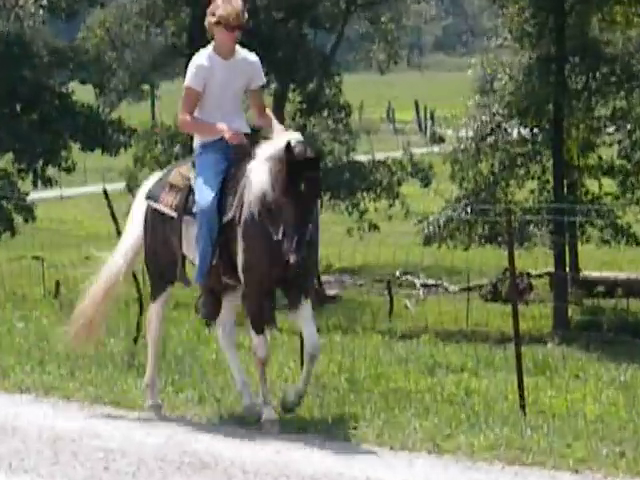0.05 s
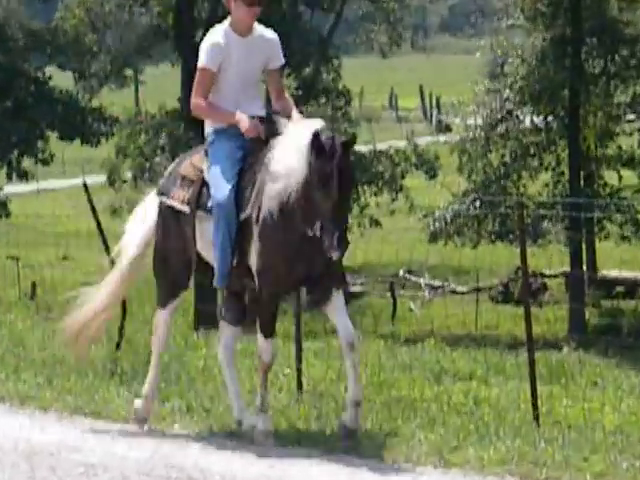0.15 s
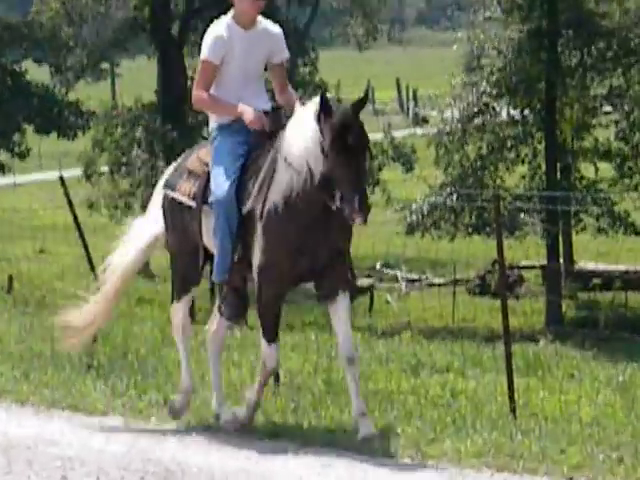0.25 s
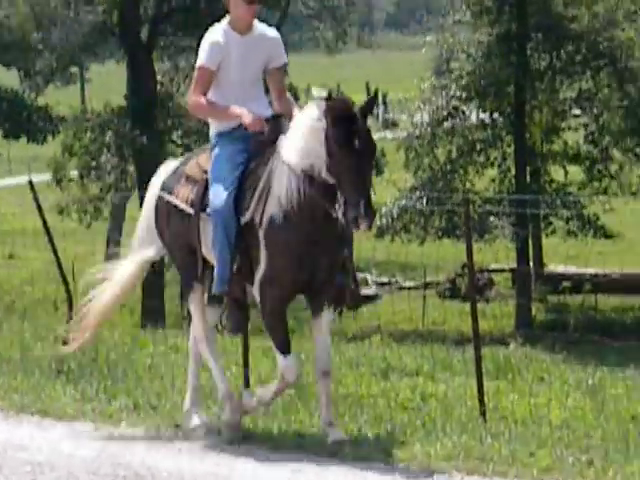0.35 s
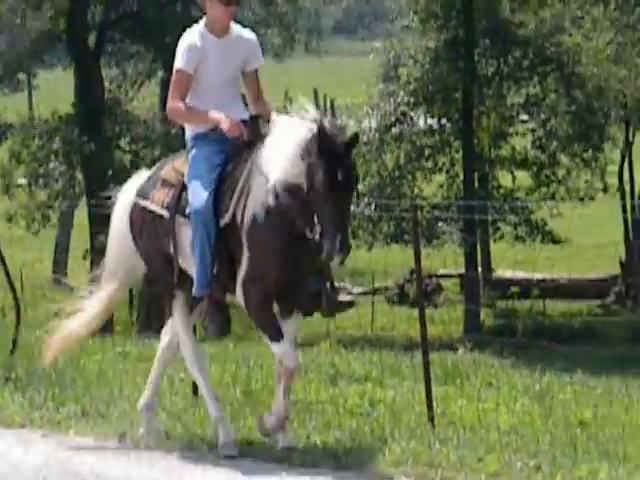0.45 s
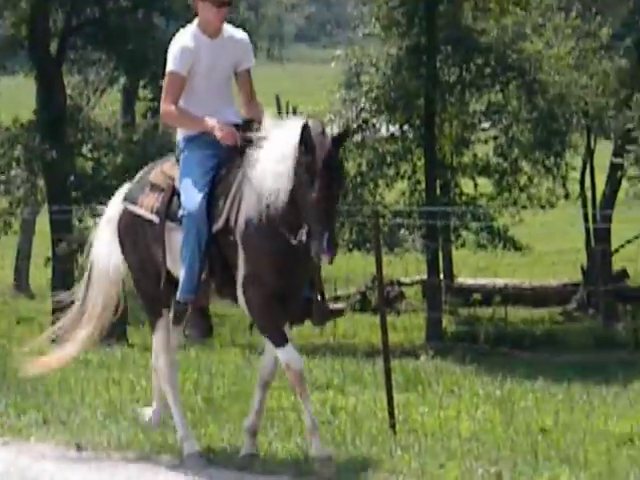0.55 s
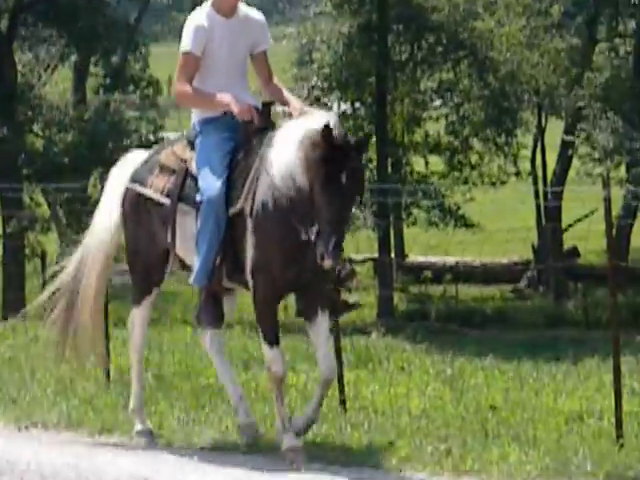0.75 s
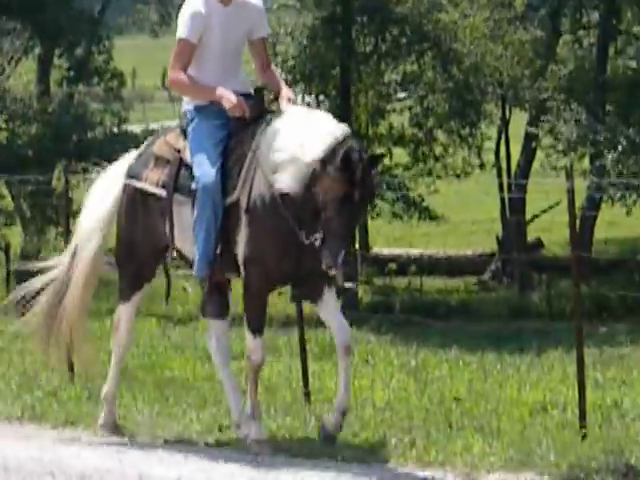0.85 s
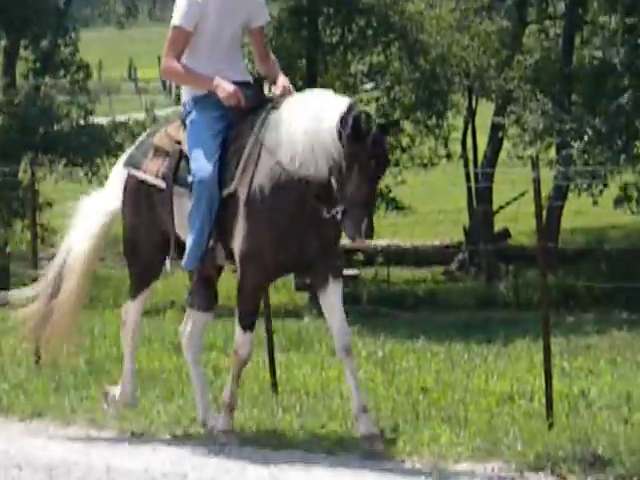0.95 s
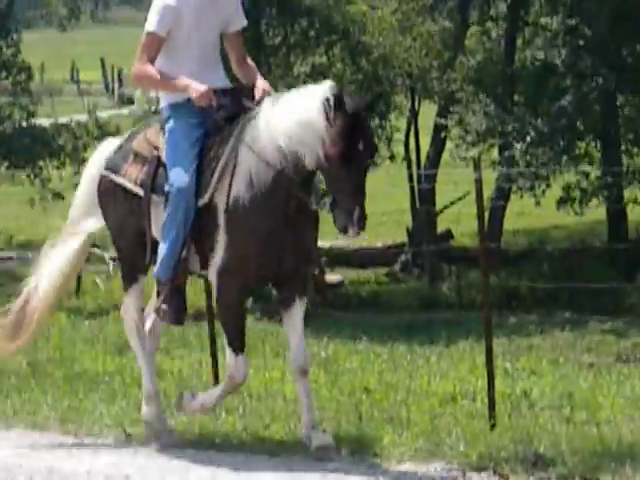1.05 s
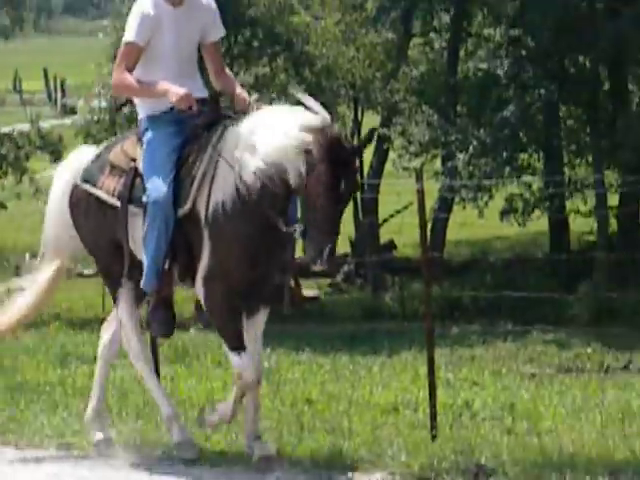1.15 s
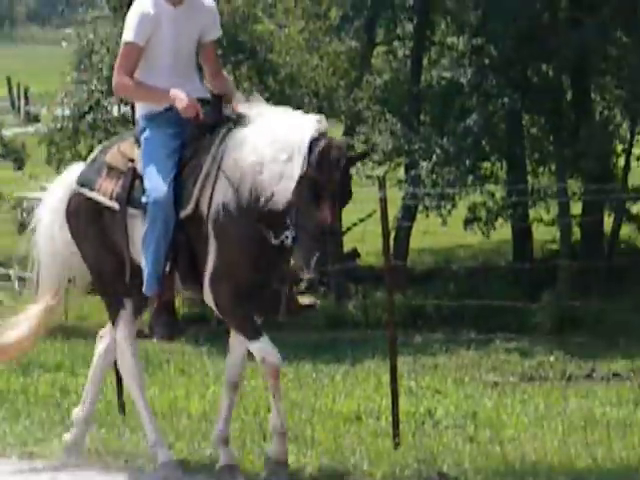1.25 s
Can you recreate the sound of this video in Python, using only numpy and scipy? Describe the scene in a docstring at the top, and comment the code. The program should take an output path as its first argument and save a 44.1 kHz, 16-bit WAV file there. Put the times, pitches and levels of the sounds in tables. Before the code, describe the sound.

Soft hoof thuds and scuffs come from a horse walking on turf in the open air. One loud, close knock and a few light clacks stand out near the start, over steady hiss and low hum on a small microphone.

```python
"""A horse walks over grass beside a gravel road, its hooves scuffing and bumping softly on the turf.
Behind it lie an airy outdoor hiss and a wavering low hum. A few light clacks sound among the steps,
and early on comes one sharp, hard knock close by. The small, narrow-band camera microphone stands
in the open air, with no echo. The knock is loud enough to clip briefly, and the level dips after it."""
import sys
import numpy as np
from scipy import signal
from scipy.fft import rfft, irfft, next_fast_len
from scipy.io import wavfile
from scipy.ndimage import map_coordinates

SR = 44100
rng = np.random.default_rng(int(sys.argv[2]) if len(sys.argv) > 2 else 0)


def file_out(sig):
    """Save sig as 16-bit WAV at sys.argv[1]."""
    # one column per channel
    cols = np.atleast_2d(sig).T
    # limit, then scale
    lim = np.clip(cols, -1, 1)
    pcm = np.round(lim * 32767).astype(np.int16)
    wavfile.write(sys.argv[1], SR, pcm)


N = 57330
TOP_HZ = 4743  # upper edge of the microphone's band


def amp(db):
    """Decibels to gain."""
    return 10 ** (np.asarray(db) / 20)


def unit(x):
    """Scale to rms 1."""
    return x / np.sqrt(np.mean(x ** 2) + 1e-20)


def curve(rows):
    """One value per sample from rows of t/s, value."""
    return np.interp(np.arange(N) / SR, *np.transpose(rows))


def since(start):
    """Seconds since start at every sample, zero before it."""
    return np.maximum(np.arange(N) / SR - start, 0)


def wobble(rate):
    """A smooth random curve with rate knots a second."""
    return map_coordinates(rng.standard_normal(4096), [np.arange(N) * rate / SR], mode="wrap")


def filtered(x, response):
    """Shape x by a gain that is a function of frequency."""
    size = next_fast_len(N + SR // 2)
    return irfft(rfft(x, size) * response(np.fft.rfftfreq(size, 1 / SR)), size)[:N]


def high_pass(x, hz, order):
    """Take out the bass below hz."""
    return signal.sosfilt(signal.butter(order, hz, "high", fs=SR, output="sos"), x)


def low_pass(x, hz, order):
    """Take out the treble above hz, with no phase shift."""
    return filtered(x, lambda f: 1 / np.sqrt(1 + (f / hz) ** (2 * order)))


def noise(colour_db):
    """Noise of rms 1 up to TOP_HZ, coloured by a function from Hz to dB."""
    white = rng.standard_normal(N)
    return unit(filtered(white, lambda f: amp(colour_db(f + 1) - 120 * (f + 1 > TOP_HZ))))


def band_noise(centre_hz, width_oct):
    """Noise in a bell-shaped band, 3 dB down at width_oct from its centre."""
    return noise(lambda f: -3 * (np.log2(f / centre_hz) / width_oct) ** 2)


def struck(t, attack_s, t60):
    """A quick rise, then a decay of 60 dB in t60 seconds."""
    return (1 - np.exp(-t / attack_s)) * np.exp(-np.log(1000) * t / t60)


def ring(t, hz, attack_s, t60):
    """One damped mode."""
    return np.sin(2 * np.pi * hz * t) * struck(t, attack_s, t60)


def air():
    """The roadside's even, airy hiss, swelling slightly."""
    # spectrum of the hiss: f/Hz, relative level/dB
    spectrum = [(25, 3.5), (60, -10.5), (120, 0.5), (200, 7), (290, 3), (390, 4.5), (560, -2.5),
                (1200, -.5), (2100, -1.5), (3000, 0), (3700, -3.5), (4400, -6.5)]
    level_db, swell_db = -42, 1.5
    hz, db = np.transpose(spectrum)
    hiss = noise(lambda f: np.interp(np.log(f), np.log(hz), db))
    return hiss * amp(level_db + swell_db * wobble(rate=12))


def hum():
    """A low background tone with a faint octave, wavering in level and phase."""
    # pitch of the hum: t/s, f/Hz
    pitch = [(0, 193.5), (.28, 188.3), (.37, 193.6), (1.23, 193.2), (1.3, 183.3)]
    # loudness of the hum: t/s, level/dB
    level = [(0, -38.5), (.04, -39.5), (.085, -45), (.13, -39.5), (.2, -43.5), (.35, -43), (.48, -39.5),
             (.62, -40.5), (.83, -38), (.98, -40), (1.05, -39.5), (1.3, -39.5)]
    waver_rad, waver_db, octave_db = 0.086, 1.5, -25
    phase = 2 * np.pi * np.cumsum(curve(pitch)) / SR + waver_rad * wobble(rate=38)
    tone = unit(np.sin(phase) + amp(octave_db) * np.sin(2 * phase))
    return tone * amp(curve(level) + waver_db * wobble(rate=38))


def clacks():
    """Small hard contacts, each with two brief modes and some bright grit, but no bass."""
    # light, dry contacts: t/s, level/dB, low mode f/Hz, high mode f/Hz,
    # relative high mode level/dB, relative grit level/dB
    contacts = [(0.1091, -12.5, 1110, 1990, -10.5, -7), (0.1459, -8.5, 774, 3350, -8, -14),
                (0.5352, -17, 2094, 2880, -5.5, -8), (0.5394, -25.5, 2130, 3100, -11, 4.5),
                (1.2848, -22, 1950, 2990, -1, 9)]
    attack_s = 0.00032
    out = np.zeros(N)
    for start, db, low_hz, high_hz, high_db, grit_db in contacts:
        t = since(start)
        low = ring(t, low_hz, attack_s, t60=0.0059)
        high = amp(high_db) * ring(t, high_hz, attack_s, t60=0.012)
        grit = high_pass(rng.standard_normal(N), hz=1200, order=2) * struck(t, attack_s, t60=0.012)
        out += amp(db) * (low + high + amp(grit_db) * grit)
    return high_pass(out, hz=290, order=2)


def knock():
    """Close by, a light touch, then a hard blow: a crack and bright modes over a faint low body."""
    # the touch and the blow: t/s, relative level/dB
    contacts = [(0.2132, -23), (0.2342, 2)]
    # resonances of the struck object: f/Hz, relative level/dB, t60/s
    modes = [(1163, -12, 0.025), (1302, 0, 0.011), (1481, -3, 0.0091), (1660, -19, 0.027),
             (2083, -8, 0.024), (2646, 0, 0.024), (2910, -7.5, 0.021), (3205, -7, 0.025),
             (3482, -5.5, .016), (3860, -18.5, 0.018)]
    level_db, crack_db, body_db, attack_s = 1.5, -4.5, -16.5, 0.0012
    bright, body = np.zeros(N), np.zeros(N)
    for start, db in contacts:
        t = since(start)
        ringing = sum(amp(mode_db) * ring(t, hz, attack_s, t60) for hz, mode_db, t60 in modes)
        crack = amp(crack_db) * rng.standard_normal(N) * struck(t, attack_s, t60=0.014)
        bright += amp(db) * (ringing + crack)
        body += amp(db + body_db) * ring(t, hz=430, attack_s=attack_s, t60=0.01197)
    return amp(level_db) * (high_pass(bright, hz=950, order=6) + body)


def hoof_scuffs():
    """Each hoof drags through grass and grit in a short, grainy rustle."""
    # hoof drags: t/s, level/dB, length/s, centre f/Hz
    drags = [(0.099, -41, 0.075, 1500), (0.203, -32, .03, 1575), (0.217, -31.5, 0.014, 1820),
             (0.309, -44, 0.036, 1470), (.675, -30.5, 0.013, 1900), (0.823, -29.5, 0.012, 2200),
             (0.849, -32, 0.028, 1850), (1.184, -31.5, 0.024, 1460), (1.206, -29.5, 0.014, 1300)]
    rise_s, grain_depth = 0.006, 0.38
    out = np.zeros(N)
    for start, db, length_s, centre_hz in drags:
        t = since(start)
        rustle = band_noise(centre_hz, width_oct=1.02)
        grains = unit(rustle * np.exp(grain_depth * wobble(rate=700)))
        envelope = (1 - np.exp(-t / rise_s)) * np.exp(-(t / length_s) ** 2)
        out += amp(db) * grains * envelope
    return out


def hoof_bumps():
    """The weight of a hoof lands on turf: a brief hollow note inside a dull thud."""
    # soft footfalls: t/s, level/dB, f/Hz
    footfalls = [(.319, -30.5, 810), (.452, -37.5, 650), (.683, -28.5, 328), (.992, -34, 570),
                 (1.063, -27.5, 389), (1.189, -29, 852), (1.208, -25.5, 1090)]
    attack_s, thud_db = 0.00041, -6.5
    out = np.zeros(N)
    for start, db, hz in footfalls:
        t = since(start)
        note = ring(t, hz, attack_s, t60=0.02)
        thud = amp(thud_db) * band_noise(hz, width_oct=0.8) * struck(t, attack_s, t60=0.064)
        out += amp(db) * (note + thud)
    return out


def scene():
    """What reaches the microphone beside the road: one channel, open air, no echo."""
    return (air() + hum() + knock() + clacks() + hoof_scuffs() + hoof_bumps())[None]


def gain_control(x):
    """The gain drops after a loud peak, holds and then recovers."""
    threshold_db, duck_per_db = -13, 0.3
    attack_s, hold_until_s, release_s = 0.01, 0.036, 0.035
    over_db = np.maximum(20 * np.log10(np.abs(x) + 1e-9) - threshold_db, 0)
    t = since(0)
    dip = np.clip(t / attack_s, 0, 1) * np.clip(1 - (t - hold_until_s) / release_s, 0, 1)
    duck_db = np.zeros(N)
    for peak in signal.find_peaks(over_db)[0]:
        duck_db[peak:] = np.maximum(duck_db[peak:], duck_per_db * over_db[peak] * dip[:N - peak])
    return x * amp(-duck_db)


def record(dry):
    """The camera microphone hears a narrow band; the knock clips briefly and the level dips after it."""
    clip_level = 1.005
    ducked = gain_control(dry[0])
    narrow = low_pass(ducked, hz=3982, order=27)
    clipped = np.clip(narrow, -clip_level, clip_level)
    bass_cut = high_pass(clipped, hz=58, order=2)
    return low_pass(bass_cut, TOP_HZ, order=60)[None]


dry = scene()
out = record(dry)
file_out(out)
```